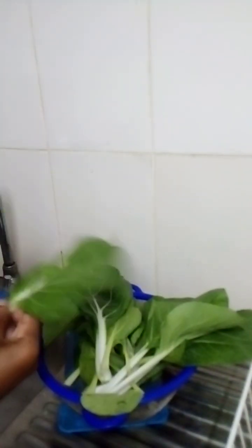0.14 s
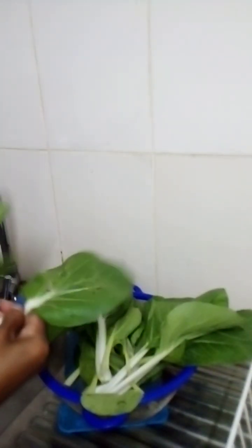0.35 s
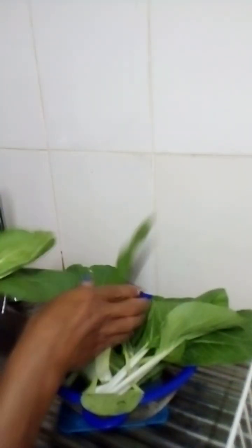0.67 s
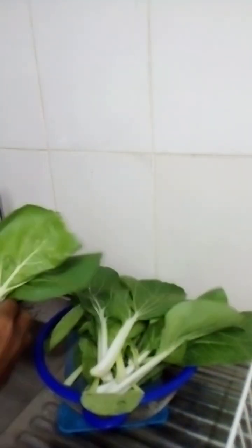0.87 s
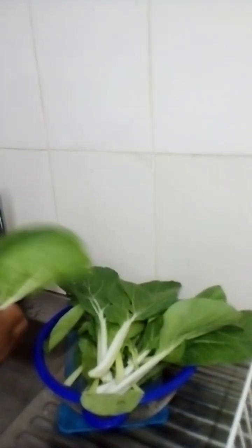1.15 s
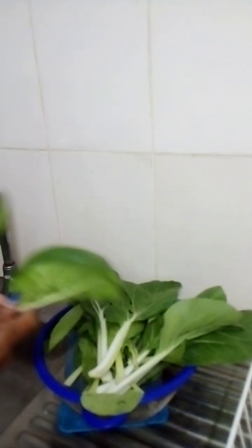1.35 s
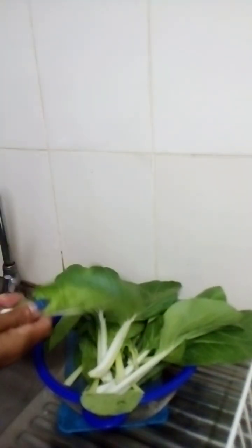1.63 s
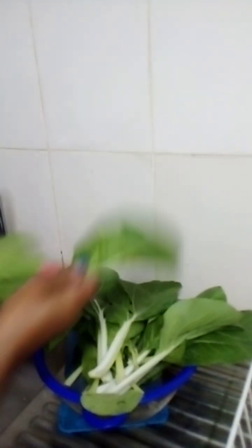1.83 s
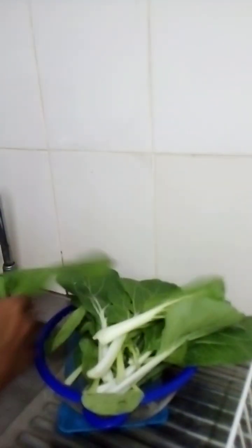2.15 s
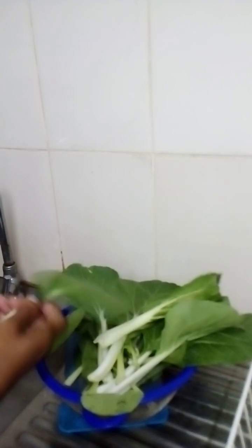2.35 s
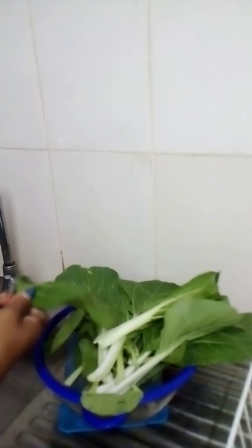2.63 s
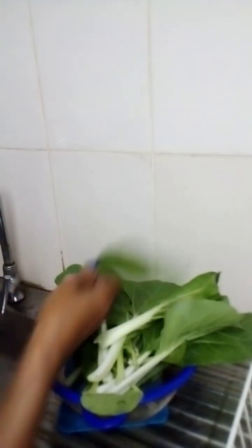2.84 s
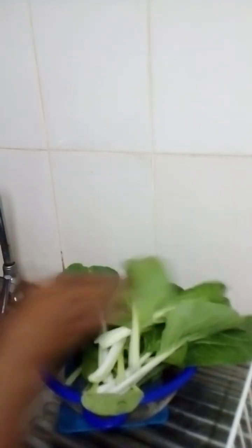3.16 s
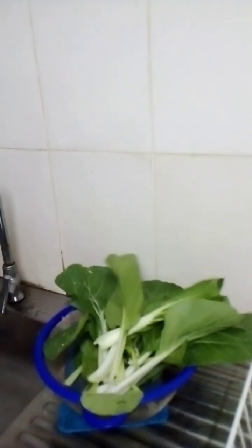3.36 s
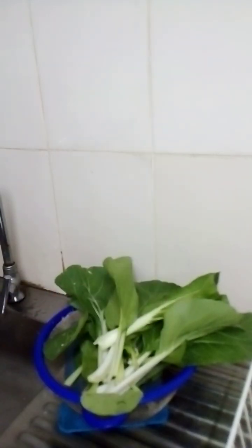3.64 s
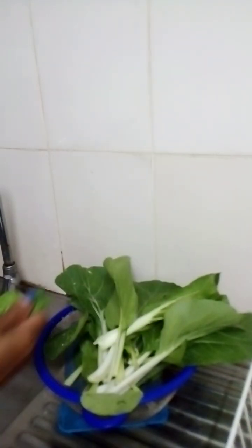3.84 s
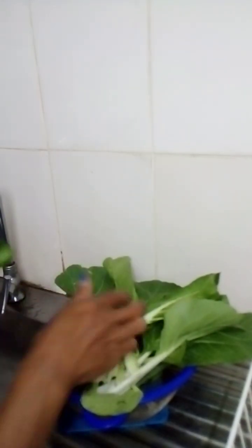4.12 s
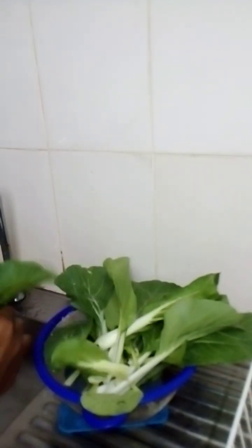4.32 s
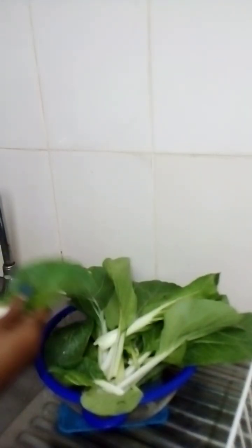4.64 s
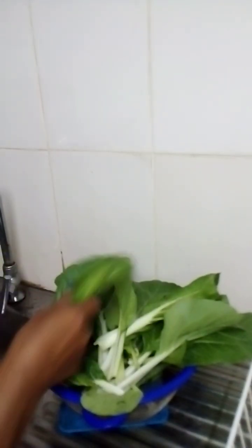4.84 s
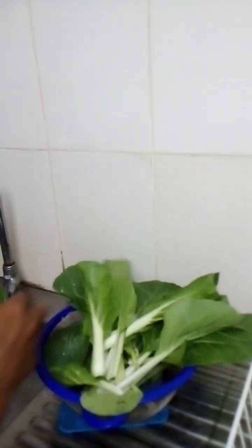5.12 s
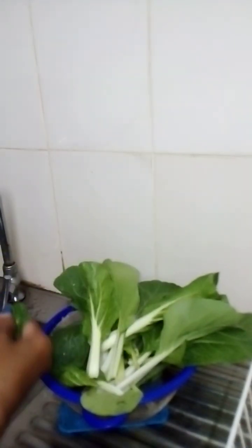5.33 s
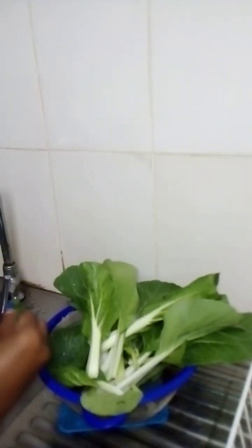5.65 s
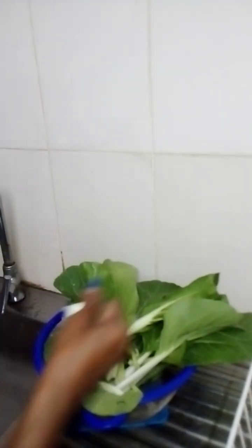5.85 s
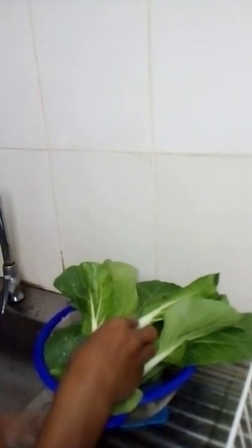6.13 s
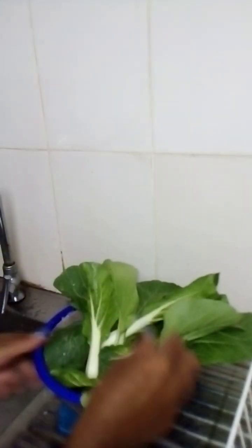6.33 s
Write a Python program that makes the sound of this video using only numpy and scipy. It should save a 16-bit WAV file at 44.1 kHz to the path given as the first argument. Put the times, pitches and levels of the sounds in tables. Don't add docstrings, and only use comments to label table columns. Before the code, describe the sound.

At a tiled kitchen sink, crisp leaf stalks are broken off close to a phone microphone. A quick cluster of brittle snaps opens, then scattered cracks, fine ticks and short wet leaf rubs. A hard crack with a dull plastic basin knock comes after two seconds, followed by sparser snaps. The tiles add a short bright echo; a faint low rumble and indistinct house murmur lie behind.

```python
import sys
import numpy as np
from scipy import signal
from scipy.io import wavfile
from scipy.ndimage import uniform_filter1d

SR = 44100
rng = np.random.default_rng(int(sys.argv[2]) if len(sys.argv) > 2 else 0)


def to_wav(s):
    ch = np.atleast_2d(s).T
    pcm = np.round(np.clip(ch, -1, 1) * 32767)
    wavfile.write(sys.argv[1], SR, pcm.astype(np.int16))


def natural_amplitude(level_db):
    exponent = np.asarray(level_db, float) / 20
    return 10 ** exponent


N = 285723

# time in seconds, level in dB.
RUMBLE_LEVEL = [(0.0, -53), (0.3, -54.5), (0.6, -54.5), (0.97, -52.5), (1.42, -56), (1.55, -53), (1.9, -50),
                (2.18, -58), (2.3, -54.5), (2.85, -53), (3.3, -54.5), (3.7, -56), (3.93, -51.5),
                (4.2, -57.5), (4.42, -53), (4.78, -51.5), (5.2, -55.5), (6.2, -52.5)]
# frequency in Hz, level in dB.
RUMBLE_SPECTRUM = [(30, -24), (60, -25.5), (85, -7), (120, -11.5), (200, -7.5), (250, -25), (400, -64)]
# frequency in Hz, width in Hz, height in dB.
RUMBLE_PEAKS = [(143.6, 17.9, 22), (189.6, 23, 4)]
# frequency in Hz, level in dB.
MURMUR_SPECTRUM = [(150, -20), (260, -5.5), (500, -5), (1000, -10), (1300, -12.5), (1500, -88)]
# frequency in Hz, level in dB.
WASH_SPECTRUM = [(1100, -9), (1400, -10), (2000, -17.5), (4200, -20.5), (6000, -14.5), (7600, -20),
                 (8400, -45), (9500, -65)]
# frequency in Hz, width in Hz, height in dB.
CORNER_MODES = [(343.3, 102, 13.5), (621, 72, 6.5), (793, 44, 11.5), (872.4, 47, 13), (1133, 59, 13.5),
                (1621, 185, 16.5), (2272, 344, 17.5), (3096, 480, 16.5), (3650, 500, 6), (5480, 160, 9),
                (6930, 950, 15)]
# loudest moment in seconds, level in dB, fade in dB per second.
STIRS = [(0.0, -55, 12), (0.4, -60.5, 35), (0.62, -59.5, 5), (0.97, -56.5, 31), (1.42, -58.5, 30),
         (1.62, -60.5, 57), (1.79, -54.5, 25), (2.3, -59, 11), (2.47, -56.5, 45), (2.75, -59.5, 4),
         (3.03, -58, 36), (3.37, -61, 34), (3.54, -60.5, 62), (3.78, -58.5, 19), (4.0, -55.5, 95),
         (4.33, -60, 7), (4.64, -57.5, 17), (4.83, -58.5, 58), (5.35, -57, 36), (5.52, -57.5, 76),
         (5.63, -62, 44), (5.76, -54.5, 63), (6.0, -63.5, 47), (6.14, -55.5, 30), (6.33, -56, 9)]
# frequency in Hz, level in dB.
HISS_SPECTRUM = [(5000, -47), (8500, 5), (13000, -6), (15200, 12), (16000, 2.5)]

# delay in seconds, level in dB.
WALL_ECHOES = [(.0040, -10), (.0091, -12), (.0135, -14), (.019, -13), (.028, -15)]
# frequency in Hz, 60 dB decay time in seconds.
TILE_DECAY = [(300, 0.33), (1000, 0.48), (3000, 0.54), (6500, 0.37), (10000, 0.28), (15000, 0.23)]

# start in seconds, level in dB, frequency in Hz,
# 60 dB decay time in seconds.
BASIN_KNOCKS = [
    (2.369, -26.5, 424, 0.014),
    (2.370, -35.5, 305, 0.045),
    (2.371, -40, 266, 0.039),
    (2.370, -29, 3950, 0.035),
    (2.3685, -30.5, 6400, 0.04),
    (1.04, -32, 1390, 0.014),
    (0.11, -46.5, 1600, 0.081),
]
# start in seconds, level in dB, frequency in Hz, 60 dB decay time in seconds.
LEAF_CHIRPS = [(.821, -59, 9650, 0.021), (.988, -63, 9000, 0.022), (.993, -73, 11400, 0.027),
               (1.927, -35, 4090, 0.02), (1.945, -52, 4210, 0.06), (2.54, -65, 11200, 0.05),
               (2.82, -70, 11000, 0.044), (3.80, -70, 8800, 0.048), (4.051, -72, 9350, .06),
               (5.37, -64, 10100, 0.018), (5.458, -48, 8800, .02), (5.70, -76, 11000, 0.05),
               (5.699, -68, 9500, 0.043), (6.11, -66, 11300, 0.07)]
# loudest moment in seconds, effort in dB, fade in dB per second, brightness in dB.
RUBS = [(0.0, -40, 250, 3), (0.2, -51.5, 9, -22), (0.7, -49.5, 16, -35), (0.869, -33.5, 600, -14),
        (1.04, -36, 150, -8), (1.085, -38, 130, -4), (1.28, -51, 67, 6), (1.442, -38, 250, -8),
        (1.6, -51.5, 176, -24), (1.79, -46.5, 138, -24), (1.935, -46, 100, -9), (1.97, -42.5, 82, -4),
        (2.29, -40.5, 220, 3), (2.378, -41, 300, -7), (2.44, -45, 130, -7), (2.58, -54, 3, -33),
        (3.365, -38, 250, -8), (3.41, -46, 90, -6), (3.84, -44, 239, -30), (4.04, -49, 134, 2),
        (4.326, -47, 300, -8), (4.37, -41, 139, 0), (4.78, -54.5, 84, -30), (5.04, -46, 98, -15),
        (5.09, -50, 202, -5), (5.47, -43.5, 350, 1), (5.68, -59, 53, -16), (6.12, -45.5, 110, -5)]

# start in seconds, peak in dB, ring in Hz, brightness in dB.
SNAPS = [(0.0034, -26, 3410, -8), (0.014, -28, 2700, -20), (0.0401, -27.5, 6450, -23),
         (0.0764, -32.5, 6380, -13), (0.095, -36, 3100, -10), (0.1181, -32.5, 6300, -9),
         (0.1251, -30, 3100, -12), (0.1348, -33.5, 1780, -29), (0.863, -30, 3150, -14.5),
         (1.014, -30, 3630, -8), (1.037, -26.5, 3330, -10), (1.0558, -26, 3500, -7.5),
         (1.0745, -27.5, 5980, -16), (1.3257, -27.5, 5840, -8.5), (1.4466, -29.5, 6360, -10),
         (1.781, -34.5, 2060, -54), (2.369, -21.5, 6260, -5.5), (2.3725, -26, 6780, -29),
         (2.3876, -31, 6450, -5), (2.3974, -38, 4240, -5), (3.3588, -24, 6090, -14),
         (3.3979, -36, 4000, -10), (3.8422, -41.5, 2970, -40), (4.3173, -21.5, 2520, -16.5),
         (4.336, -35, 3330, -7), (4.4, -33, 6600, -3), (5.0256, -30, 2740, -13),
         (5.0624, -33.5, 2600, -6.5), (5.0945, -38, 3130, -13), (5.4281, -37.5, 3130, -16)]
# start in seconds, peak in dB, brightness in dB.
TICKS = [(0.849, -34.5, -31), (1.1978, -46, -5), (1.3417, -43, -16), (1.3977, -35.5, -19),
         (1.4414, -32.5, -13), (1.9663, -40, -26), (1.9734, -39.5, -28), (1.9994, -54, -14),
         (2.0442, -39.5, -13), (2.1375, -48, -1), (2.2204, -60, -2), (2.2408, -39.5, -2.5),
         (2.2556, -41.5, -15), (2.286, -34.5, -14), (2.7112, -48, -34), (3.3413, -38, -13),
         (3.4022, -37, -5.5), (4.04, -49, -23), (4.257, -55, -30), (4.3213, -34, -32), (5.0035, -46, -16),
         (4.3904, -36.5, -4), (5.009, -45, -16), (5.458, -54, -13), (5.4693, -39.5, -5),
         (6.0945, -43.5, -4), (6.1648, -48, -7), (6.2063, -45, -16)]
# start in seconds, peak in dB, brightness in dB.
CREAKS = [(0.238, -48.5, -35), (0.2683, -53, -5), (0.4332, -43.5, -30), (0.581, -51, -34),
          (0.6532, -42.5, -17), (0.703, -49, -33), (0.9154, -50, -31), (0.994, -50, -23),
          (1.7974, -49, -35), (2.5394, -52, -16), (2.7706, -52, -26), (2.8194, -53.5, -20),
          (3.1494, -56, -34), (3.3693, -48, -3), (3.7758, -58.5, -33), (3.851, -48, -36), (4.3454, -52, -3),
          (5.002, -52, -33), (5.0335, -38.5, -14), (5.3425, -46.5, -12), (5.3694, -58, -18),
          (5.416, -51, -6), (5.7024, -53, -27), (5.844, -56, -5.5), (6.3385, -57.5, -6)]
RING_DB = [1.5, 5.5, 0.5]
ROOM_DB = [-3.5, -2.5, 5]
RING_BAND_HZ = [1700, 7800]
# frequency in Hz, level in dB.
CRACK_BODY = [(200, -32), (700, -4.5), (1500, -5.5), (2400, -1.5), (4000, -1), (5300, -0.5), (6500, 2),
              (7400, -8.5), (8300, -25), (12000, -50)]
# frequency in Hz, level in dB.
CRACK_EDGE = [(5000, -11.5), (7500, 0.5), (9500, -4), (11500, -6), (13500, -7.5), (14800, 3.5), (15700, 5),
              (16300, 0.5)]

HISS_DB, MURMUR_DB, WASH_DB = -84, -64, -60
MURMUR_FOLLOWS, WASH_FOLLOWS = 0.12, 0.5
STIR_RISE_DB_PER_S, RUB_RISE_DB_PER_S = 106, 502
GRAINS_PER_S, GRAIN_DB, GRAIN_FOLLOWS = 260, -62.5, 0.72
TICK_HZ, CREAK_HZ, PITCH_SPREAD = 6450, 2478, 0.057
WET_PER_DULL, RING_IN_ROOM_DB = 0.13, -1.5


def evened(x):
    return x / np.sqrt(np.mean(x ** 2) + 1e-30)


def read(points, hz):
    f, value = np.transpose(points)
    return np.interp(np.log(hz + 1), np.log(f + 1), value)


def add(mix, s, sound):
    part = mix[round(s * SR):][:len(sound)]
    part += sound[:len(part)]


def colour(points, size=1024):
    log_gain = read(points, np.fft.rfftfreq(size, 1 / SR)) * np.log(10) / 20
    log_gain = np.concatenate([log_gain, log_gain[-2:0:-1]])
    spectrum = np.exp(np.conj(signal.hilbert(log_gain)))
    taps = np.fft.ifft(spectrum).real[:size // 2]
    return taps / np.linalg.norm(taps)


def swells(rows, rise, t):
    s, db, fade = np.transpose(rows)[:3, :, None]
    return natural_amplitude(2 * (db - np.maximum(rise * (s - t), abs(fade) * (t - s))))


def drifting_noise(points, peaks, level_db, patchy_db, size):
    hop = size // 4
    frames, hz = N // hop + 5, np.fft.rfftfreq(size, 1 / SR)
    a, b, patches = rng.standard_normal((frames, len(hz), 3)).T
    patches = uniform_filter1d(uniform_filter1d(patches, size=8, axis=0), size=8, axis=1)
    shape_db = read(points, hz) + sum(db / (1 + (2 * (hz - f) / w) ** 2) for f, w, db in peaks)
    z = (a + 1j * b) * natural_amplitude(shape_db[:, None] + patchy_db * evened(patches))
    noise = signal.istft(z, nperseg=size, noverlap=size - hop)[1][:N]
    return evened(noise) * natural_amplitude(level_db)


def air():
    t = np.arange(N) / SR
    level_db = np.interp(t, *np.transpose(RUMBLE_LEVEL))
    rumble = drifting_noise(RUMBLE_SPECTRUM, RUMBLE_PEAKS, 0, patchy_db=1.47, size=4096)
    rumble = rumble / (uniform_filter1d(rumble ** 2, size=2600) + 0.14) ** 0.044
    rumble = evened(rumble) * natural_amplitude(level_db)
    frames = t[::64]
    stir = swells(STIRS, STIR_RISE_DB_PER_S, frames).sum(axis=0) + natural_amplitude(2 * MURMUR_DB)
    murmur_db = np.interp(t, frames, 10 * np.log10(stir))
    murmur_db = murmur_db + MURMUR_FOLLOWS * (level_db - level_db.mean())
    murmur = drifting_noise(MURMUR_SPECTRUM, CORNER_MODES, murmur_db, patchy_db=2.5, size=2048)
    wash_db = WASH_DB + WASH_FOLLOWS * (murmur_db - murmur_db.mean())
    wash = drifting_noise(WASH_SPECTRUM, CORNER_MODES, wash_db, patchy_db=3.0, size=1024)
    return rumble + murmur + wash


def tiles(x):
    size = SR // 2
    taps = np.zeros(size)
    at = np.arange(100, size - 16, 16)
    taps[at + rng.integers(0, 16, len(at))] = rng.choice([-1., 1.], len(at))
    hz, t, z = signal.stft(taps, SR, nperseg=128)
    decay = natural_amplitude(-60 * t / read(TILE_DECAY, hz)[:, None])
    tail = signal.istft(z * decay, SR, nperseg=128)[1]
    tail = natural_amplitude(-1) * tail / np.linalg.norm(tail)
    for s, db in WALL_ECHOES:
        add(tail, s, natural_amplitude(np.array([db])))
    return signal.fftconvolve(x, tail)[:N]


def basin():
    out, t = np.zeros(N), np.arange(4000) / SR
    rows = BASIN_KNOCKS + LEAF_CHIRPS
    noise = rng.standard_normal((len(rows), len(t)))
    onset = 1 - np.exp(-t / 0.00096)
    for (s, db, hz, t60), c in zip(rows, noise):
        unsteady = 1 + 0.07 * evened(uniform_filter1d(c, size=50))
        turns = hz * np.cumsum(unsteady) / SR
        add(out, s, natural_amplitude(db - 60 * t / t60) * np.sin(2 * np.pi * turns) * onset)
    return out


def coloured(body, edge):
    dull = signal.oaconvolve(body, colour(CRACK_BODY))[:N]
    bright = signal.oaconvolve(edge, colour(CRACK_EDGE))[:N]
    return dull + bright


def grains(effort_db):
    size = (rng.random(N) < GRAINS_PER_S / SR) * natural_amplitude(3.77 * np.minimum(rng.exponential(1, N), 5))
    size *= natural_amplitude(GRAIN_DB + GRAIN_FOLLOWS * (effort_db + 49.5))
    kind, t = rng.integers(0, 12, N), np.arange(150) / SR
    out = np.zeros(N)
    for k, hz in enumerate(np.geomspace(2200, 11500, num=12)):
        cycles = hz * t
        pop = np.sin(2 * np.pi * cycles) * cycles * np.exp(-cycles / 1.57)
        pop = pop * natural_amplitude(-5.0 * np.log2(hz / 3000))
        out += signal.oaconvolve(size * (kind == k), pop)[:N]
    return out


def rustle():
    bright = np.transpose(RUBS)[3, :, None]
    t = np.arange(N) / SR
    frames = t[::64]
    power = swells(RUBS, RUB_RISE_DB_PER_S, frames) + 1e-12
    total = power.sum(axis=0)
    effort_db = np.interp(t, frames, 10 * np.log10(total))
    bright_db = np.interp(t, frames, (power * bright).sum(axis=0) / total)
    slips = (rng.random(N) < 2500 / SR) * natural_amplitude(3.0 * np.minimum(rng.exponential(1, N), 5))
    puff = np.exp(-np.arange(200) / SR / 0.00064)
    patter = signal.oaconvolve(slips, puff)[:N] * rng.standard_normal((2, N))
    patter = evened(patter) * natural_amplitude(1.12 * (effort_db + 50.5) - 65)
    return coloured(patter[0], patter[1] * natural_amplitude(bright_db - 1.5)) + grains(effort_db)


def cracks():
    kinds = [SNAPS]
    for rows, hz in ((TICKS, TICK_HZ), (CREAKS, CREAK_HZ)):
        kinds.append([(s, db, hz * (1 + PITCH_SPREAD * rng.standard_normal()), bright_db)
                      for s, db, bright_db in rows])
    out = []
    for rows, ring_db, room_db in zip(kinds, RING_DB, ROOM_DB):
        for s, db, hz, bright_db in rows:
            wet_db = room_db - WET_PER_DULL * (bright_db + 15)
            out.append((s, db, hz, bright_db, ring_db, wet_db))
    return out


def snaps():
    t = np.arange(500) / SR
    body, edge, ring = np.zeros((3, 2, N))
    tear = (1 - np.exp(-(t / 0.00052) ** 3)) * np.exp(-t / 0.0021)
    click = signal.unit_impulse(len(t), idx=40)
    rows = cracks()
    noise = rng.standard_normal((len(rows), 3, len(t)))
    bursts = noise[:, :2] * tear
    bursts = bursts / np.linalg.norm(bursts, axis=2, keepdims=True) + 0.54 * click
    for (s, db, hz, bright_db, ring_db, room_db), (a, b), c in zip(rows, bursts, noise[:, 2]):
        send = natural_amplitude(db + np.array([0, room_db]))
        wander = 1.26 * evened(uniform_filter1d(c, size=50))
        tone = np.sin(2 * np.pi * hz * t + wander) * tear
        for k, thump in enumerate((a, click)):
            add(body[k], s, send[k] * 2.51 * thump)
            add(edge[k], s, send[k] * natural_amplitude(bright_db + 18.0) * b)
            add(ring[k], s, send[k] * natural_amplitude(ring_db - 3.5 + k * RING_IN_ROOM_DB) * tone)
    ring = signal.sosfilt(signal.butter(3, RING_BAND_HZ, "band", fs=SR, output="sos"), ring)
    return np.array([coloured(body[k], edge[k]) + ring[k] for k in range(2)])


def scene():
    dry, send = snaps()
    leaves, knocks = rustle(), basin()
    echo = tiles(send + 0.28 * leaves + 0.78 * knocks)
    return (dry + leaves + knocks + echo + air())[None]


def gate(x):
    z = signal.stft(x, nperseg=512, noverlap=384)[2]
    power = uniform_filter1d(uniform_filter1d(abs(z) ** 2, size=3, axis=0), size=12, axis=1)
    power_db = 10 * np.log10(power + 1e-20)
    over_db = power_db - np.percentile(power_db, 15, axis=1, keepdims=True)
    cut_db = 0.6 * np.clip(3.0 - over_db, 0, 9)
    return signal.istft(z * natural_amplitude(-cut_db), nperseg=512, noverlap=384)[1][:N]


def roll_off(x):
    return signal.sosfilt(signal.butter(12, 16990, fs=SR, output="sos"), x)


def record(dry):
    heard = signal.sosfilt(signal.butter(2, 55, "high", fs=SR, output="sos"), dry[0])
    heard = gate(heard) + drifting_noise(HISS_SPECTRUM, [], HISS_DB, patchy_db=2.0, size=512)
    lowpass = signal.firwin(511, 15850, window=("kaiser", 4), fs=SR)
    limited = signal.oaconvolve(heard, lowpass, "same")
    return roll_off(limited[None])


dry = scene()
out = record(dry)
to_wav(out)
```